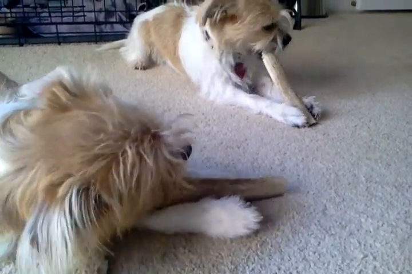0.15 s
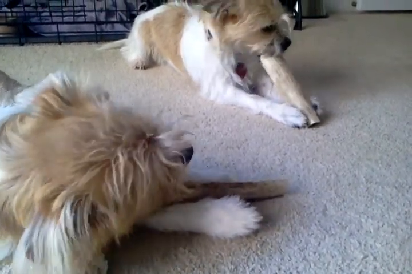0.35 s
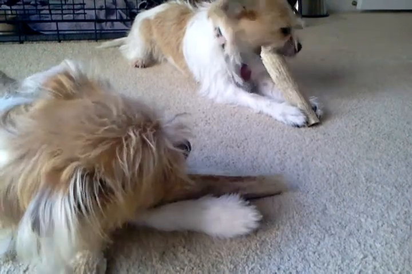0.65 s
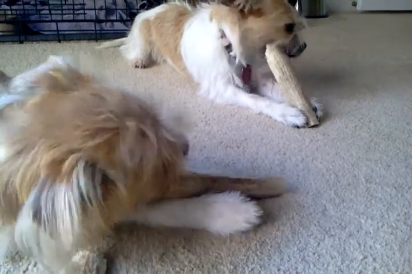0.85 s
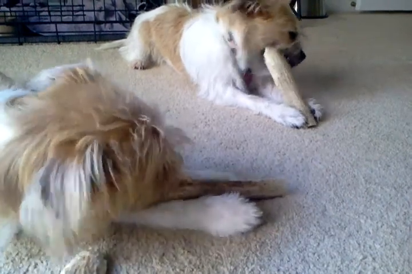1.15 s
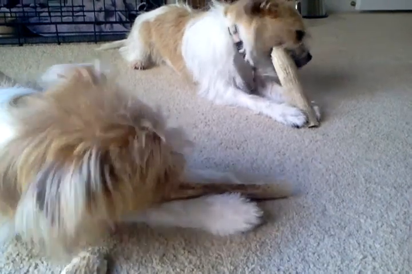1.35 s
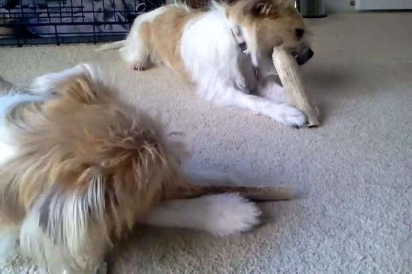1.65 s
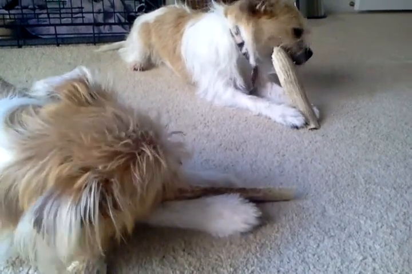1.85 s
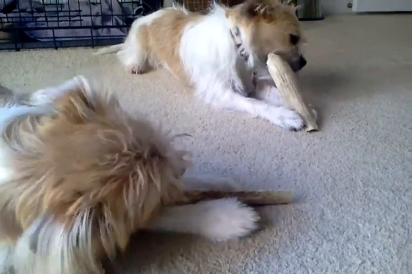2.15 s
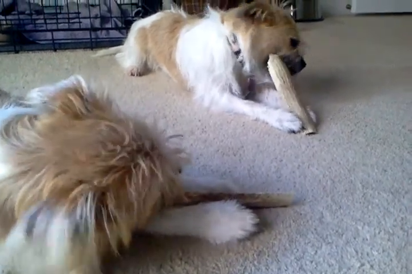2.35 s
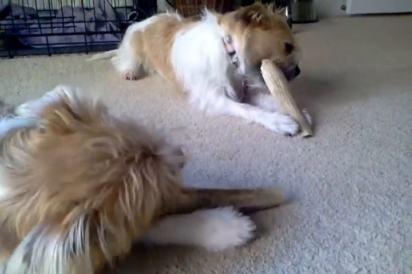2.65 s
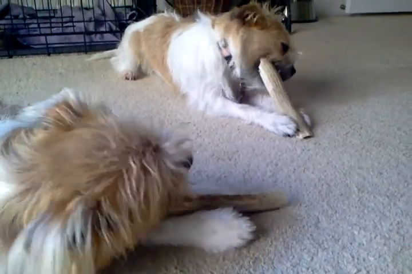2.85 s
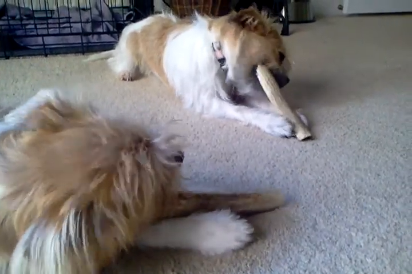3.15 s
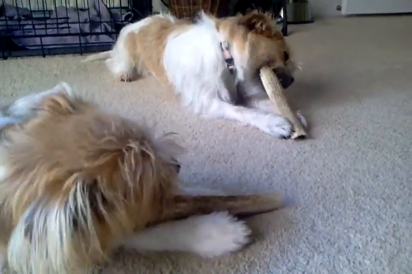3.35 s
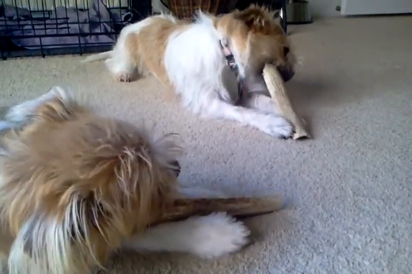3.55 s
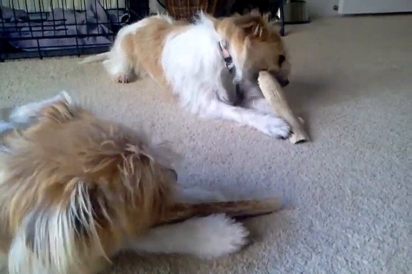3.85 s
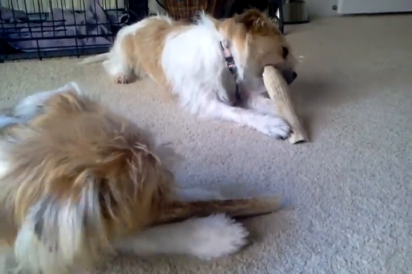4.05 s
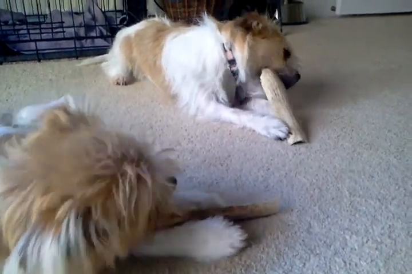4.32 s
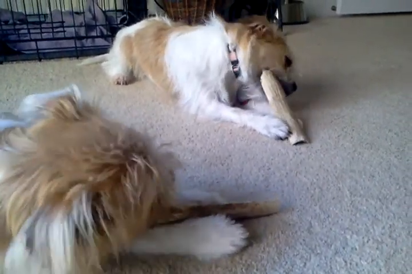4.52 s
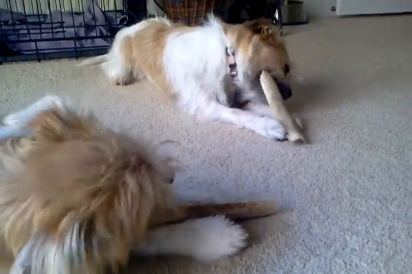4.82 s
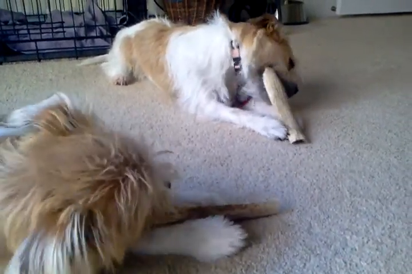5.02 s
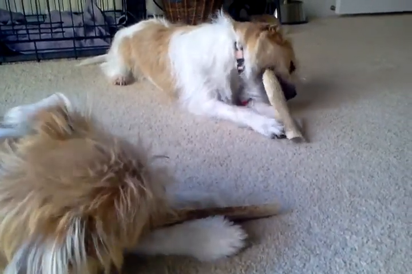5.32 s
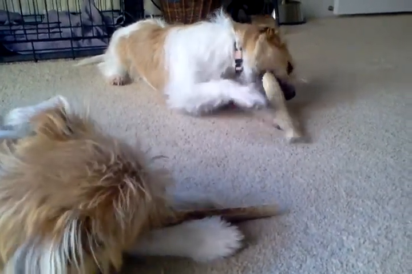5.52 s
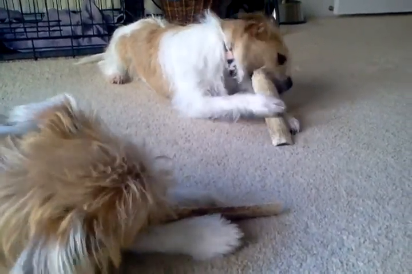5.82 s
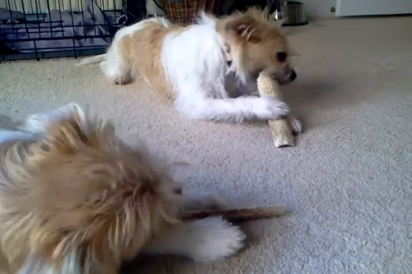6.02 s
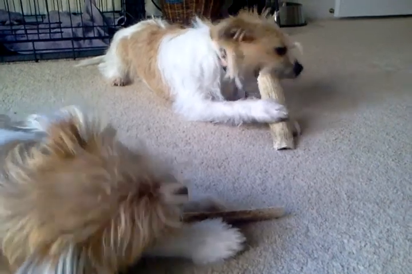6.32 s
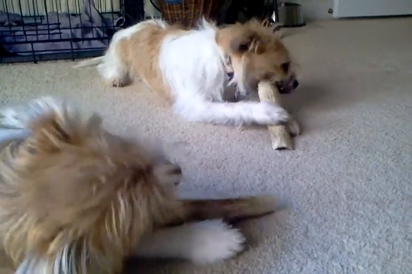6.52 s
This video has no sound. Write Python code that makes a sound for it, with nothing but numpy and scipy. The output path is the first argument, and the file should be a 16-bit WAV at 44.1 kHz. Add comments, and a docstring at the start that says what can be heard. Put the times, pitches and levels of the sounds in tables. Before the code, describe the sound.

Two small dogs gnaw hard antler chews on a living room carpet, close to a small microphone with little top end. Each bite is a sharp click with a brief hollow ring and a duller knock, spaced unevenly. Light clicks open, with firmer snaps at about 0.8 and 1.4 seconds. The loudest crack comes at 2.2 seconds, and another at 2.6 carries a low bump against the floor. After a lull of tiny ticks, a quick crunchy cluster lands at 3.9 seconds and a softer knock at 4.2. From about 5.3 seconds to the end, near 6.7, smaller clicks come more often, with faint gritty rubbing of teeth and paws. Soft wet ticks of lips and tongue fall between bites. The room echo is very short, and a steady hiss, low rumble and faint hum lie underneath.

```python
"""Dogs gnawing antler chews

Two small dogs lie on a living-room carpet, close to one small microphone with little top end. Each bite is a
tooth slipping over the antler in a few tiny jerks: a bright snap at the contact, a short hollow ring, a duller
knock of jaw and chew. Some slips jolt the floor. Teeth, lips and tongue tick in between, and teeth and paws rub
grittily. The room answers briefly; a steady hiss, a low rumble and a faint hum lie under it all."""
import sys
import numpy as np
from scipy import signal
from scipy.fft import rfft, irfft
from scipy.io import wavfile

SR = 44100
rng = np.random.default_rng(int(sys.argv[2]) if len(sys.argv) > 2 else 0)


def inscribe(sig):
    """Save sig as 16-bit PCM at rate SR to the path in sys.argv[1].

    A 1-D sig is mono; a 2-D sig holds one channel per row.
    Samples are clipped to [-1, 1] before scaling.
    """
    pcm = np.round(np.clip(np.atleast_2d(sig).T, -1, 1) * 32767)
    wavfile.write(sys.argv[1], SR, pcm.astype(np.int16))


N = 294588
TIME = np.arange(N) / SR


def bites(clean_width_hz=470, widening_hz_per_s=91000, widest_hz=1500):
    """A tooth bears down and slips: a clean break snaps narrowly, longer rubbing damps and broadens it."""
    # One sharp click a row: a tooth slip, or its short room echo.
    # start_s, length_s, knock_db, knock_hz, ring_db, ring_hz, snap_db, snap_hz
    clicks = [(.2730, 0.00076, -45.5, 580, -50, 990, -74, 2450),
              (.3562, .001, -54.5, 700, -59, 2970, -64.5, 5230),
              (0.7864, 0.000078, -42, 960, -67, 2130, -69, 6040),
              (0.8128, 0.00085, -48.5, 3300, -56, 5870, -46, 4377),
              (0.8204, 0.0022, -51.5, 600, -52.5, 1733, -47.5, 4470),
              (1.3486, 0.00079, -39.5, 1220, -42.5, 2540, -47.5, 4600),
              (1.357, 0.0082, -41, 950, -63.5, 2250, -53.5, 6040),
              (1.5914, 0.0025, -52, 890, -69, 5170, -50.5, 3680),
              (1.7419, 0.00254, -65, 900, -47.5, 1290, -59, 5830),
              (1.9334, 0.0026, -59.5, 442, -71.5, 4850, -54, 3300),
              (2.1450, 0.0019, -43.5, 720, -35.5, 1070, -37, 4520),
              (2.1455, 0.0079, -48, 910, -31.5, 3370, -34, 4600),
              (2.1538, 0, -33.5, 1500, -42, 5090, -23, 2920),
              (2.1536, 0.00052, -38, 1040, -35, 4670, -28.5, 3950),
              (2.1552, 0.00069, -41, 600, -37, 2770, -32, 5000),
              (2.3670, .001, -55, 1610, -66, 4900, -54.5, 3300),
              (2.414, 0.00363, -54, 350, -53, 1230, -69, 4000),
              (2.5880, 0.0016, -41, 642, -50, 1430, -41, 3160),
              (2.5904, 0.0041, -49, 1900, -47, 3150, -32, 4460),
              (2.5968, 0.0041, -37, 520, -46, 1057, -41, 2940),
              (2.599, 0.0019, -38, 746, -52, 1570, -49, 4300),
              (2.6980, 0.00265, -57, 960, -58, 1380, -64, 3500),
              (2.8340, 0.0011, -50.5, 954, -56.5, 2450, -58.5, 5700),
              (3.8803, 0.00245, -45, 2000, -48, 5220, -44, 3900),
              (3.8878, 0.0059, -48, 2000, -43, 5000, -52, 3100),
              (3.8906, 0.0072, -39.5, 2770, -39.5, 5200, -42, 4400),
              (3.8980, 0.0026, -42, 1060, -40, 1690, -41, 3000),
              (3.9018, 0.00035, -48, 700, -51, 5270, -57, 5740),
              (3.9176, 0.001, -51.5, 420, -63, 5200, -47.5, 3060),
              (4.225, 0.0069, -46.5, 535, -49.5, 2220, -54, 3620),
              (4.236, 0.00116, -72, 400, -52.5, 1137, -53, 5930),
              (4.531, 0.002, -46.5, 1540, -57, 2950, -53, 5430),
              (4.555, 0.0105, -55, 990, -64, 3300, -58, 6000),
              (4.8120, 0.003, -48, 570, -59.5, 1170, -65, 5800),
              (5.2469, 0.007, -57.5, 1410, -58, 1820, -57.5, 5070),
              (5.345, 0.002, -45.5, 627, -44.5, 1380, -54, 2740),
              (5.4875, .0006, -64, 1700, -57, 3180, -50, 5300),
              (5.6619, 0.00065, -54, 1750, -55, 3154, -48, 5700),
              (5.7537, 0.0095, -53, 702, -58.5, 1120, -74, 2490),
              (5.8184, 0.0037, -51, 2500, -49, 5070, -50, 3450),
              (5.862, 0.017, -56.5, 2010, -56, 5360, -60.5, 4500),
              (5.9027, 0.00283, -56, 1250, -47, 670, -49, 2780),
              (5.9150, 0.0084, -48.5, 800, -48.5, 1190, -54, 3080),
              (5.9284, 0.0013, -60, 1500, -48, 3110, -48, 5040),
              (6.0286, 0.0042, -58, 1000, -55, 640, -72, 3000),
              (6.1570, 0.0044, -53.5, 595, -61, 1250, -59.5, 3000),
              (6.187, 0.0014, -52, 440, -58, 3060, -60, 2500),
              (6.2037, 0.0073, -54, 1026, -58.5, 2260, -74.5, 6000),
              (6.4710, 0.0043, -56, 676, -60, 2350, -60, 3800),
              (6.6094, 0.0026, -64, 1203, -50.5, 2160, -76, 5930),
              (6.6373, 0.0037, -49, 890, -52.5, 2290, -56, 5700)]
    return place((start_s, contact(length_s, *voice,
                                   min(clean_width_hz + widening_hz_per_s * length_s, widest_hz)))
                 for start_s, length_s, *voice in clicks)


def contact(slip_s, knock_db, knock_hz, ring_db, ring_hz, snap_db, snap_hz, snap_width_hz):
    """A tooth knocks jaw and chew, rings the chew at a pitch set by the grip, and snaps at the contact."""
    # Small things radiate little bass, and no jerk is infinitely sharp.
    force_band = np.vstack([butterworth(2, 120, "high"), butterworth(5, 7640)])
    force = signal.sosfilt(force_band, slip_force(slip_s))
    knock = resonate(force, knock_hz, width_hz=0.359 * knock_hz)
    jaw = resonate_twice(force, hz=378, width_hz=290)
    ring = resonate(force, ring_hz, width_hz=280)
    small_tooth = butterworth(5, 0.97 * snap_hz, "high")
    blunt_tip = butterworth(2, 1.8 * snap_hz)
    snap = signal.sosfilt(np.vstack([small_tooth, blunt_tip]), resonate(force, snap_hz, snap_width_hz))
    return (at_level(knock, knock_db) + at_level(jaw, knock_db - 9)
            + at_level(ring, ring_db) + at_level(snap, snap_db))


def slip_force(slip_s, jerks_per_s=3600, spread_db=1.5, crumble_db=-20, crumble_s=0.0016):
    """Force of a tooth that lets go, judders along the surface and crumbles it a little."""
    t = TIME[:1500]
    catches = (rng.random(len(t)) < jerks_per_s / SR) * (t < slip_s)
    sizes = from_db(spread_db * rng.standard_normal(len(t)))
    grit = rng.standard_normal(len(t))
    jerks = catches * sizes * np.sign(grit)
    jerks[0] = 1.76  # the tooth first lets go
    crumble = grit * np.exp(-t / (crumble_s + slip_s / 2))
    return unit_energy(jerks) + from_db(crumble_db) * unit_energy(crumble)


def tooth_ticks():
    """A tooth tip touches lightly, with no slip and hardly any knock."""
    # One touch a row: start_s, level_db, pitch_hz
    touches = [(0.2265, -55, 5900), (0.438, -49, 6040), (0.441, -46.5, 5390), (0.7231, -47.5, 2950),
               (0.761, -58, 6300), (0.9353, -54.5, 4500), (0.983, -58.5, 3900), (1.9415, -55, 3500),
               (2.7012, -53, 3500), (3.038, -59.5, 4600), (3.0624, -52, 4500), (3.154, -58, 5600),
               (3.6312, -54.5, 2750), (3.7294, -53, 3000), (4.372, -61, 6350), (4.8265, -54.5, 6000),
               (5.549, -50.5, 5200), (5.732, -58, 3300), (5.958, -65, 5500), (6.104, -59, 2950)]
    return place((start_s, contact(slip_s=0, knock_db=db - 10.5, knock_hz=2230, ring_db=db - 12.5,
                                   ring_hz=hz, snap_db=db, snap_hz=hz, snap_width_hz=370))
                 for start_s, db, hz in touches)


def antler_ring(teeth):
    """The teeth leave the stiff chew ringing faintly for some tens of milliseconds."""
    # Resonances of the antler: pitch_hz, width_hz, peak_gain_db
    modes = [(1150, 130, -5.5), (2500, 38, -12), (2740, 190, -18), (3270, 76, -15), (3448, 49, -18),
             (4220, 54, -18), (5240, 90, -18.5), (5550, 45, -20)]
    return sum(from_db(db) * resonate(teeth, hz, width_hz) for hz, width_hz, db in modes)


def floor_jolts():
    """Some slips jolt dog and chew against the floor."""
    # One jolt a row: start_s, thud_db, boom_db, boom_hz, shudder_db
    blows = [(2.156, -54, -43.5, 213, -66), (2.5955, -51, -30.5, 340, -34.5), (2.623, -60, -44.5, 420, -47),
             (3.8990, -60, -44.5, 367, -50), (4.2270, -61.5, -46.5, 207, -52.5)]
    return place((start_s, jolt(*blow)) for start_s, *blow in blows)


def jolt(thud_db, boom_db, boom_hz, shudder_db, thud_s=0.06, boom_s=0.0054, shudder_s=0.049):
    """A soft, deep thud on the carpet, a short hollow boom and a low, lingering shudder."""
    t = TIME[:SR // 2]
    push = rng.standard_normal(len(t)) * np.exp(-t / thud_s)
    thud = resonate_twice(push, hz=55, width_hz=120)
    pitch_hz = boom_hz * (1 - 0.069 * (1 - np.exp(-t / 0.044)))  # sinks as the jaw lets go
    pulse = np.sin(2 * np.pi * np.cumsum(pitch_hz) / SR) * np.exp(-t / boom_s)
    boom = resonate(pulse, boom_hz, width_hz=boom_hz)
    shake = rng.standard_normal(len(t)) * np.exp(-t / shudder_s)
    shudder = resonate_twice(shake, hz=297, width_hz=110)
    return at_level(thud, thud_db) + at_level(boom, boom_db) + at_level(shudder, shudder_db)


def mouth_ticks(count=50, longest_s=0.0083, spread_db=1.2):
    """Faint wet ticks and rasps of lips and tongue, scattered at random."""
    ticks = []
    for when, length, loudness, brightness, depth, grip in rng.random((count, 6)):
        tick = contact(slip_s=longest_s * length,
                       knock_db=-60, knock_hz=900 * 2 ** (2 * depth - 1),
                       ring_db=-65, ring_hz=2200 * 2 ** (grip - 0.5),
                       snap_db=-68, snap_hz=4600 * 2 ** (brightness - 0.5), snap_width_hz=1200)
        ticks.append((when * N / SR, from_db(spread_db * (2 * loudness - 1)) * tick))
    return place(ticks)


def rubbing(grains_per_s=900, spread_db=0.5):
    """Teeth, fur and paws rub on chew and carpet: fine grit catches and lets go."""
    # Strength of the rubbing, greatest once a paw takes a new hold: time_s, level_db
    strength = [(0, -92), (.38, -68.5), (.45, -58), (.53, -79), (1.3, -71.5), (2.0, -68.5), (3.0, -67),
                (3.7, -71), (4.35, -69.5), (4.65, -66), (4.85, -66.5), (5.4, -65.5), (5.75, -66),
                (5.92, -63), (6.05, -64.5), (6.35, -66.5), (6.68, -62)]
    # Resonances that the grit excites: pitch_hz, width_hz, gain_db
    modes = [(2400, 900, -0.5), (3300, 780, 3), (5600, 3000, -4.5)]
    sizes = from_db(spread_db * np.clip(rng.standard_normal(N), -2, 2))
    signs = rng.choice([-1, 1], N)
    grit = (rng.random(N) < grains_per_s / SR) * sizes * signs
    rasp = sum((-1) ** k * from_db(db) * resonate(grit, hz, width_hz)
               for k, (hz, width_hz, db) in enumerate(modes))
    return over_time(strength) * unit_rms(rasp)


def living_room(direct, build_s=0.013, echo_blur_s=0.0024):
    """A few slightly blurred echoes and a diffuse tail that the carpet soon swallows."""
    # Room tail, its level against the direct sound: frequency_hz, level_db, t60_s
    reverb = [(151, -4.5, 0.16), (296, -7, 0.21), (550, -11, 0.25), (990, -12, 0.25), (1690, -9, 0.17),
              (2350, -3, 0.26), (3150, -19, 0.27), (4200, -14.5, .28), (5500, -18, .27), (7000, -9, 0.27)]
    # First reflections from furniture, wall and ceiling: delay_s, gain_db
    echoes = [(.0028, -18), (.0098, -27), (0.0172, -33), (0.0282, -25), (.0305, -23.5)]
    t = TIME[:SR // 2]
    response = np.zeros(len(t))
    edges_hz = np.geomspace(90, 9000, 12)
    for low, high in zip(edges_hz, edges_hz[1:]):
        hz = np.sqrt(low * high)
        noise = signal.sosfilt(butterworth(2, [low, high], "band"), rng.standard_normal(len(t)))
        t60_s = at_hz(reverb, hz, column=2)
        tail = noise * from_db(-60 * t / t60_s) * (1 - np.exp(-t / build_s))
        band_share = 2 * (high - low) / SR
        response += unit_energy(tail) * from_db(at_hz(reverb, hz)) * np.sqrt(band_share)
    for delay_s, db in echoes:
        blur = unit_energy(rng.standard_normal(len(t)) * np.exp(-t / echo_blur_s))
        response += from_db(db) * np.roll(blur, int(delay_s * SR))
    return signal.fftconvolve(direct, response)[:N]


def hiss():
    """Steady, broad room tone."""
    # Colour of the hiss: frequency_hz, relative_density_db
    spectrum = [(240, -26.5), (400, -4), (471, -4), (508, -7.5), (561, -4), (730, -1.5), (1100, -2.5),
                (1470, -6), (2280, -3.5), (3330, -13), (3920, -16.5), (4910, -15), (7060, -20),
                (8000, -16.5), (10400, -37), (17600, -120)]
    return from_db(-58.5) * coloured_noise(spectrum)


def rumble(waver_db=1.0, wavers_per_s=9):
    """Low noise whose level wanders a little."""
    # Colour of the rumble: frequency_hz, relative_density_db
    spectrum = [(20, -37), (32, -19.5), (50, -14.5), (64, -15.5), (88, -4), (130, -3.5), (205, 1),
                (260, -2.5), (310, -1.5), (380, -8.5), (480, -29), (800, -80)]
    # Slow drift of its level: time_s, gain_db
    swell = [(0, 2.5), (.3, -1.5), (6.1, 0.5), (6.4, 0.5), (6.68, 0.5)]
    noise = from_db(-61) * coloured_noise(spectrum)
    wander = np.interp(TIME * wavers_per_s, np.arange(200), rng.standard_normal(200))
    return noise * from_db(waver_db * wander) * over_time(swell)


def hum():
    """Two narrow bands of noise, heard as faint low tones that waver."""
    # Tones of the hum: pitch_hz, width_hz, base_level_db
    tones = [(102.5, 8.5, -79), (193.9, 18, -74.5)]
    # The hum swells and fades: time_s, gain_db
    swell = [(0, 2.5), (.7, 6), (1.1, -7), (1.45, 7.5), (1.9, 10), (2.5, 4.5), (2.9, -7.5), (3.45, 1.5),
             (4.4, 0), (6.68, -4.5)]
    drone = sum(from_db(db) * unit_rms(resonate_twice(rng.standard_normal(N), hz, width_hz))
                for hz, width_hz, db in tones)
    return drone * over_time(swell)


def microphone(x, cutoff_hz=7150, skirt_hz=8750, skirt_db=-21.5):
    """A small microphone cuts the treble steeply; only a trace passes above the cut."""
    main = signal.sosfilt(butterworth(16, cutoff_hz), x)
    skirt = signal.sosfilt(signal.cheby1(12, 1, skirt_hz, fs=SR, output="sos"), x)
    return main + from_db(skirt_db) * skirt


def resonate(x, hz, width_hz):
    """One damped resonance, gain 1 at its peak."""
    r = np.exp(-np.pi * width_hz / SR)
    feedback = [1, -2 * r * np.cos(2 * np.pi * hz / SR), r * r]
    return (1 - r * r) / 2 * signal.lfilter([1, 0, -1], feedback, x + 1e-18)


def resonate_twice(x, hz, width_hz):
    """The same resonance twice in series, for steeper flanks."""
    return resonate(resonate(x, hz, width_hz), hz, width_hz)


def butterworth(order, hz, kind="low"):
    """Sections of a filter with a flat passband."""
    return signal.butter(order, hz, kind, fs=SR, output="sos")


def coloured_noise(spectrum):
    """Even noise of a given colour, with an rms of one."""
    hz = np.arange(N // 2 + 1) * SR / N
    return unit_rms(irfft(rfft(rng.standard_normal(N)) * from_db(at_hz(spectrum, hz)), N))


def place(sounds):
    """Lay (start_s, sound) pairs on the time line."""
    out = np.zeros(N + SR)
    for start_s, sound in sounds:
        start = max(int(start_s * SR), 0)
        out[start:start + len(sound)] += sound
    return out[:N]


def at_level(x, db):
    """Set a short sound's rms level through the microphone, its energy counted over 5 ms."""
    return x * from_db(db) * np.sqrt(0.005 * SR / np.sum(microphone(x) ** 2))


def at_hz(points, hz, column=1):
    """Read a column of a table on a log-frequency axis."""
    table = np.array(points)
    return np.interp(np.log(np.maximum(hz, 1)), np.log(table[:, 0]), table[:, column])


def over_time(curve):
    """A (time_s, level_db) curve as a gain at every sample."""
    return from_db(np.interp(TIME, *np.transpose(curve)))


def from_db(db):
    """Decibels to gain."""
    return 10 ** (np.asarray(db) / 20)


def unit_energy(x):
    """Scale so that the squares sum to one."""
    return x / np.sqrt(np.sum(x ** 2) + 1e-20)


def unit_rms(x):
    """Scale so that the squares average one."""
    return np.sqrt(len(x)) * unit_energy(x)


def scene():
    """The gnawing close by, the room's short answer and the background, in mono."""
    teeth = bites() + tooth_ticks()
    chewing = teeth + antler_ring(teeth) + mouth_ticks()
    jolts = floor_jolts()
    background = hiss() + rumble() + hum()
    return (chewing + living_room(chewing) + jolts + rubbing() + background)[None]


def record(dry):
    """Everything passes through the one small microphone."""
    return microphone(dry)


dry = scene()
out = record(dry)
inscribe(out)
```